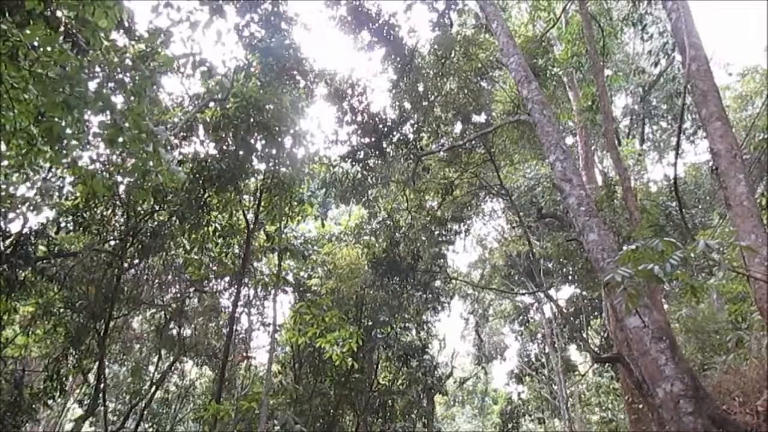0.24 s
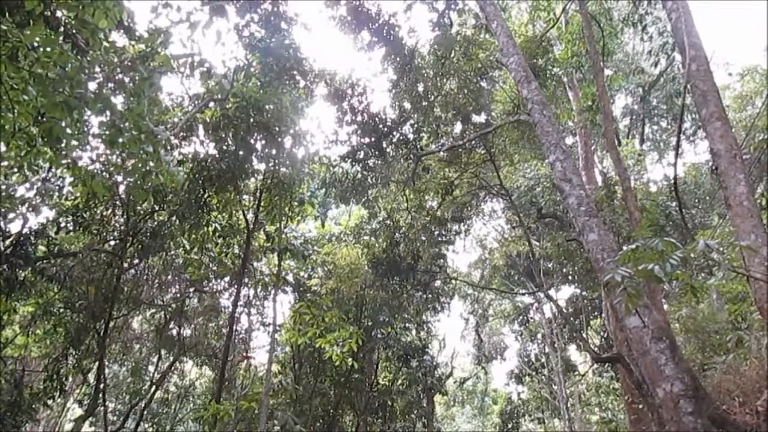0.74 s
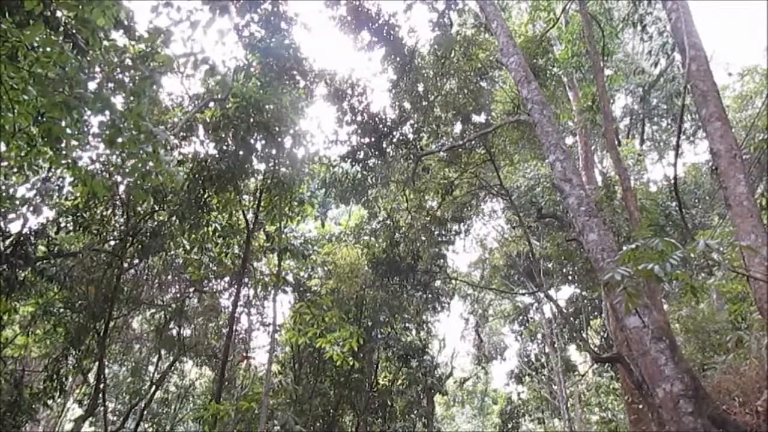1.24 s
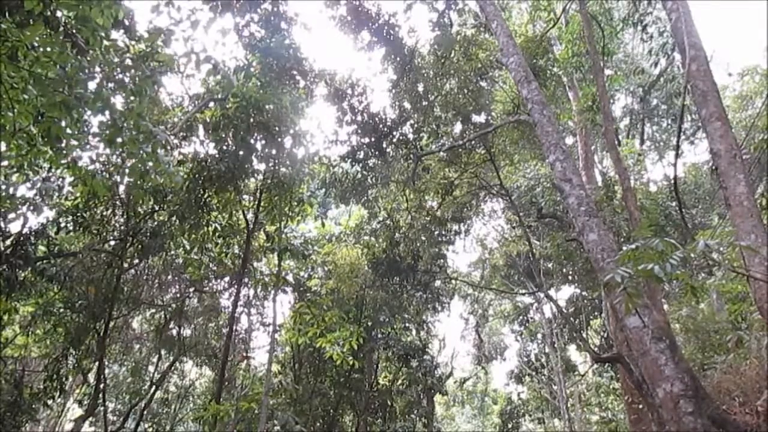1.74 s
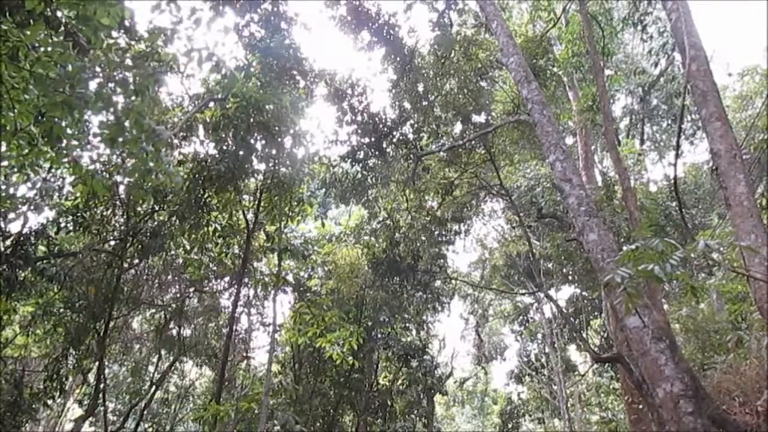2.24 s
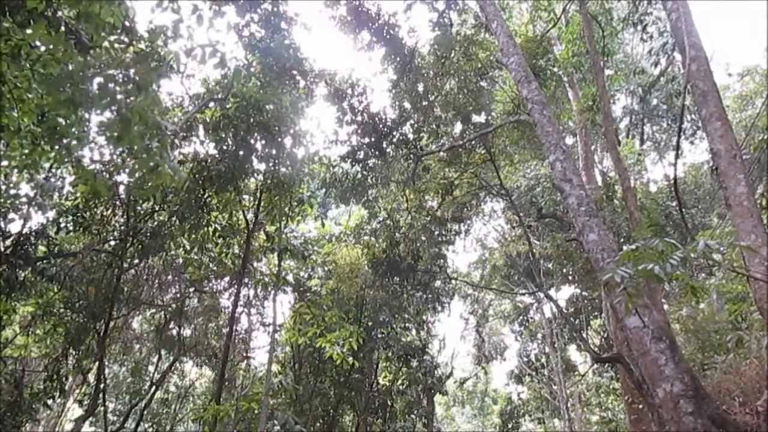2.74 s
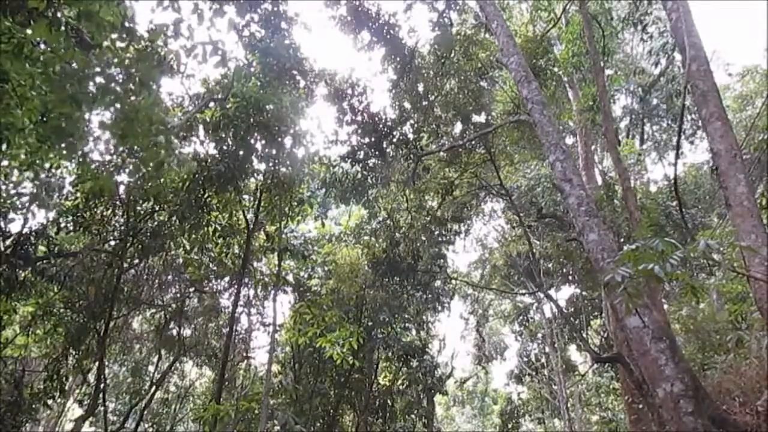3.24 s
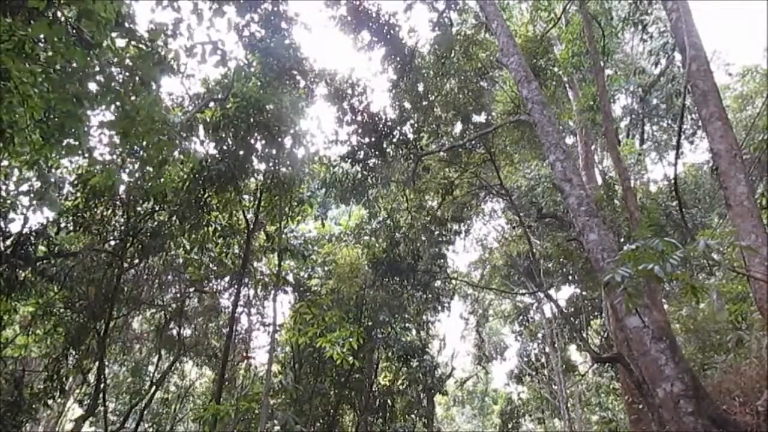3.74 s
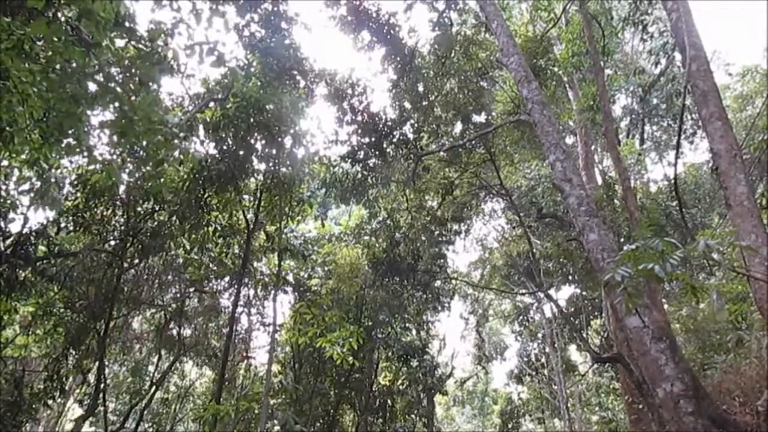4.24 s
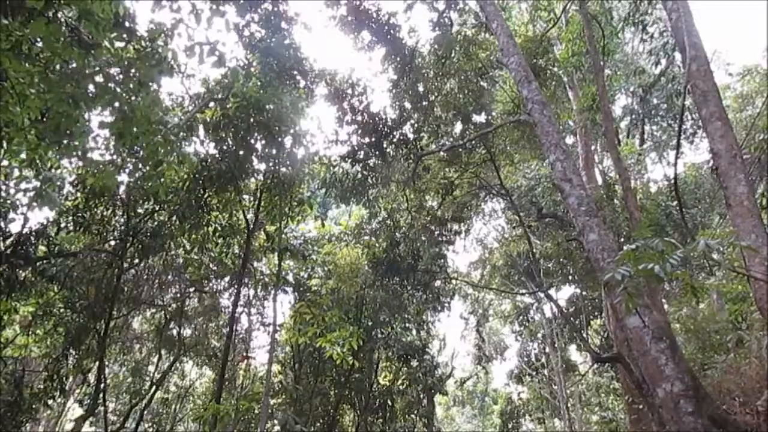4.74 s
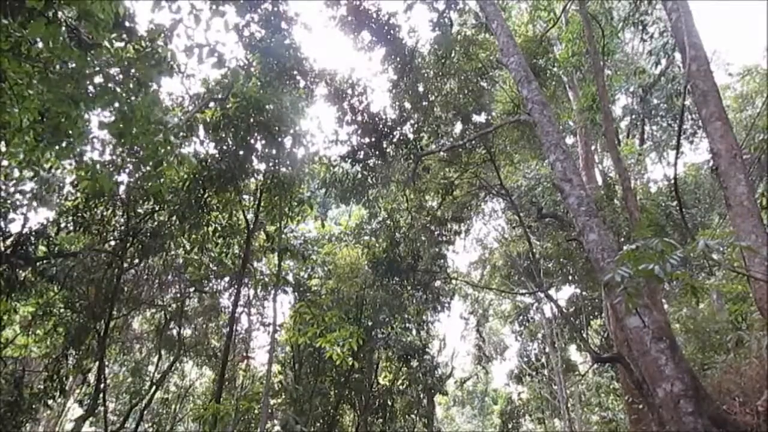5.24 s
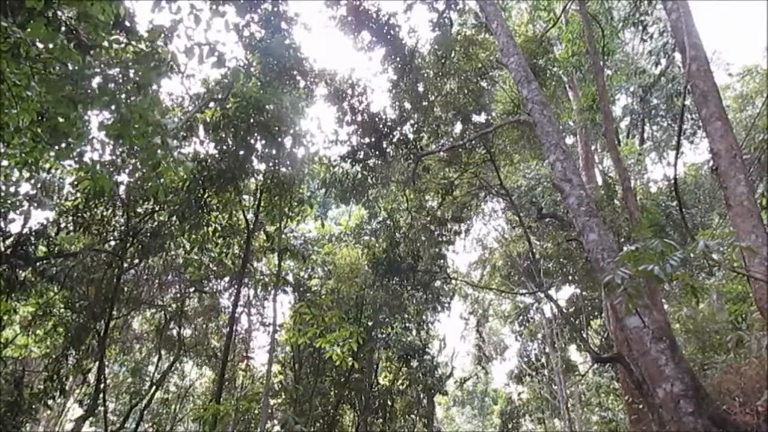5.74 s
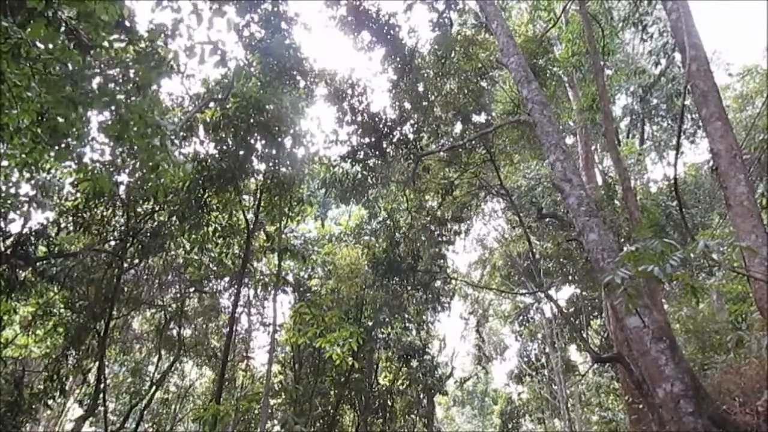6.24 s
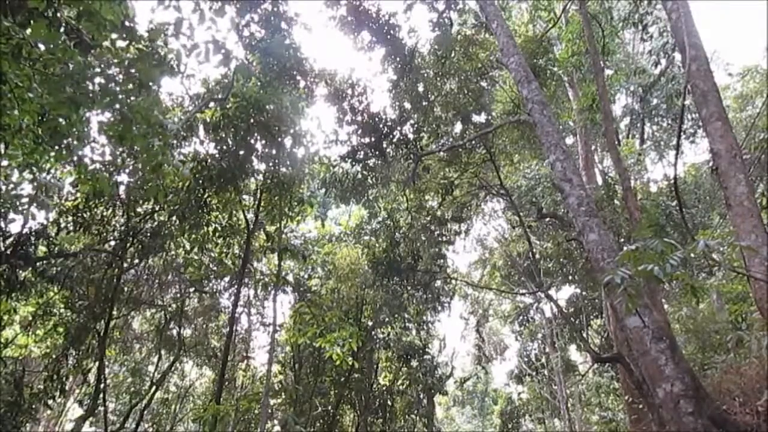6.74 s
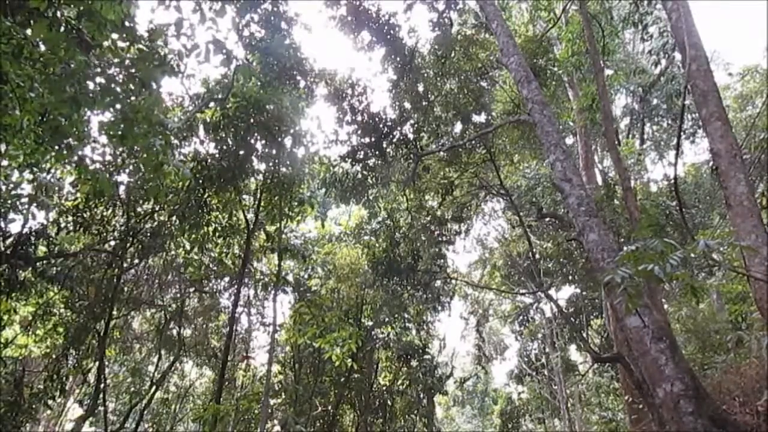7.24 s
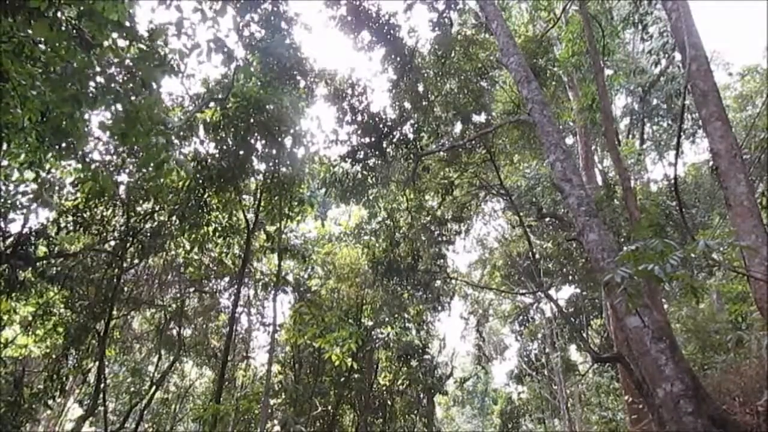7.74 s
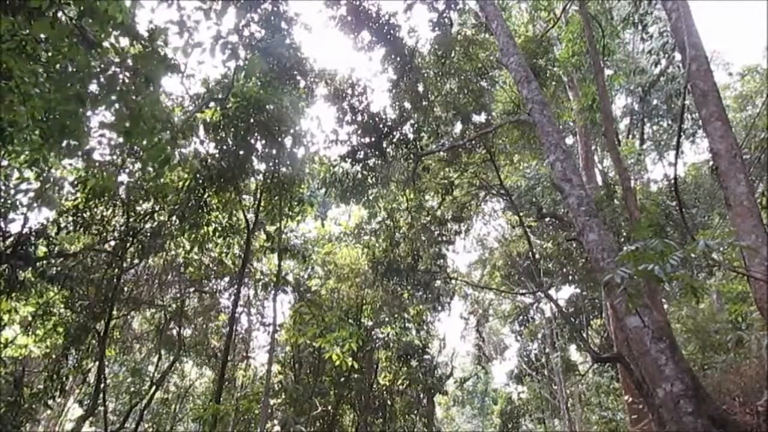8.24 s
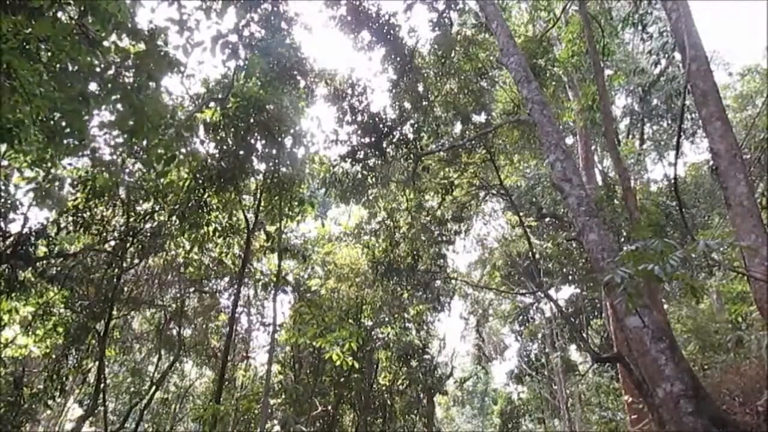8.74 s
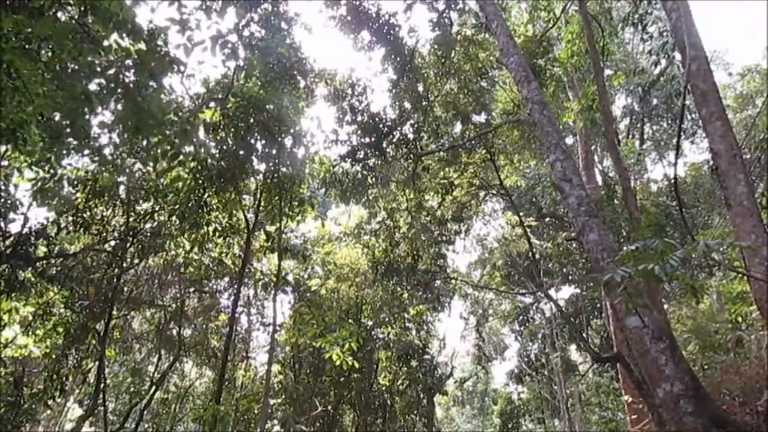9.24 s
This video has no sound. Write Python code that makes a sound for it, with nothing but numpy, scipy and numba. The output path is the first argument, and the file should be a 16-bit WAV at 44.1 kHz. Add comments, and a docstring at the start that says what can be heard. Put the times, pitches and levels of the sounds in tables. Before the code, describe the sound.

A stereo microphone stands in a wood, with soft, low air and leaf hush. Throughout, a dense high insect drone shimmers, while brighter cicada buzzing swells and falls irregularly, strongest in the first three seconds and leaning right. From 0 s two birds on the right repeat quick four-note phrases: a faint lead-in, then three clear, mellow notes around 1 kHz, each gliding downward. The louder bird is slightly lower; each repeats roughly every 0.75 s, so they interleave, with discrete echoes and a brief woodland tail. Softer distant notes appear around 0.5, 1.3 and 1.5 s, then in small clusters from 6.3 s, clearest near 9.1 s. From about 3 to 6 s a harsh, buzzy rasp repeats every 0.4 s, mostly a bright pickup followed by a fuller accent, blurred by the trees. At about 9.4 s comes one small, dry woody knock.

```python
"""Whistling birds in an insect-filled wood

Two forest birds to the right repeat a four-note phrase of short falling whistles, in and out of step:
gliding near-sines with discrete echoes and a diffuse tail. Farther birds are softer in the same scatter.
A harsh rasping caller is a pulse train ringing two resonances; insect choruses are random clicks in
resonant bands. A small woody knock is a sum of dying modes; the hush of air and leaves is shaped noise."""
import sys
import numpy as np
from scipy import signal
from scipy.io import wavfile
from numba import njit

SR = 44100
rng = np.random.default_rng(int(sys.argv[2]) if len(sys.argv) > 2 else 0)


def undo_db(level):
    """Turn decibels back into plain size, where 20 dB means ten times bigger."""
    steps = np.asarray(level, float) / 20
    return 10 ** steps


def digitize_waveform(pressure):
    """Quantize a signal to 16-bit integers and store it at the path in sys.argv[1].

    Rows of a 2-D input are taken as channels; values are limited to [-1, 1].
    """
    field = np.atleast_2d(pressure).T
    bounded = np.clip(field, -1, 1)
    quanta = np.round(bounded * 32767).astype(np.int16)
    wavfile.write(sys.argv[1], SR, quanta)


N = 418068


def rms_one(x):
    """Normalization: scales a signal to unit rms."""
    return x / np.sqrt(np.mean(x ** 2) + 1e-20)


def in_time(rows):
    """Linear interpolation: the columns of a table, read at every sample."""
    times_s, *columns = np.transpose(rows)
    return [np.interp(np.arange(N) / SR, times_s, column) for column in columns]


def at_hz(points, hz):
    """Logarithmic frequency scale: a spectrum interpolated on a log axis."""
    points_hz, values = np.transpose(points)
    return np.interp(np.log(hz), np.log(points_hz), values)


def sides(pan_db):
    """Level-difference stereo: left and right gains for a left-minus-right level."""
    return undo_db(np.array([[.5], [-.5]]) * pan_db)


def add(track, sound, start_s):
    """Superposition: mixes a sound in at a time, trimmed at both ends."""
    at = round(start_s * SR)
    part = sound[max(-at, 0):max(N - at, 0)]
    track[max(at, 0):max(at, 0) + len(part)] += part


def drift(corner_hz):
    """Low-passed random process: slow chance of unit rms, drawn at every 50th sample."""
    r = np.exp(-100 * np.pi * corner_hz / SR)
    draws = rng.standard_normal(N // 50 + 1002)
    slow = signal.lfilter([1], [1, -2 * r, r * r], draws)[1000:]  # the filter has settled by then
    return np.interp(np.arange(N) / 50, np.arange(len(slow)), rms_one(slow))


def swells(top_s, top_db, hold_s, rise_db_per_s, fade_db_per_s, floor_db):
    """Addition of powers: level in dB of sounds that climb, hold and fade, summed over a floor."""
    top_s, top_db, hold_s = [np.reshape(column, (-1, 1)) for column in (top_s, top_db, hold_s)]
    since_s = np.arange(0, N, 100) / SR - top_s if np.ndim(top_s) else 0
    rise_db = rise_db_per_s * since_s
    fade_db = fade_db_per_s * (hold_s - since_s)
    shape_db = np.minimum(0, np.minimum(rise_db, fade_db))
    power = np.sum(undo_db(2 * (top_db + shape_db)), axis=0) + undo_db(2 * floor_db)
    return np.interp(np.arange(N), np.arange(0, N, 100), 10 * np.log10(power))


@njit
def resonate(x, hz, width_hz, sr):
    """Two-pole resonance with a moving centre, applied twice so its skirts are steep."""
    r = np.exp(-np.pi * width_hz / sr)
    for turn in range(2):
        y = np.zeros_like(x)
        for c in range(x.shape[0]):
            for i in range(2, x.shape[1]):
                pull = 2 * r * np.cos(2 * np.pi * hz[i] / sr)
                y[c, i] = (1 - r * r) / 2 * (x[c, i] - x[c, i - 2]) + pull * y[c, i - 1] - r * r * y[c, i - 2]
        x = y
    return x


def wood(x, wet_db, onset_s=0.01):
    """Diffuse reverberation: trunks scatter sound into a dying tail, unrelated on the two sides."""
    t60_s = 0.76
    t = np.arange(SR) / SR
    tail = rng.standard_normal((2, SR)) * undo_db(-60 * t / t60_s) * (1 - np.exp(-t / onset_s))
    tail /= np.sqrt(np.sum(tail ** 2, axis=1, keepdims=True))
    return undo_db(wet_db) * signal.fftconvolve(np.atleast_2d(x), tail, axes=1)[:, :N]


# spectrum of air and leaf noise: (frequency [Hz], relative power density [dB per Hz])
HUSH_SPECTRUM = [(15, -33), (25, 3.5), (101, 4.5), (267, 0.5), (741, -10), (919, -6), (1410, -11.5),
                 (2360, -21), (3170, -13), (4620, -19), (5730, -10.5), (6920, -13), (8580, -13),
                 (9300, -9.5), (15500, -25)]
# left-right correlation of that noise: (frequency [Hz], correlation [-1 to 1])
HUSH_CORRELATION = [(60, -0.43), (200, -0.48), (400, -0.24), (800, 0.26), (2000, 0.03)]


def hush():
    """Band-shaped noise: third octaves stir a little; bass correlates negatively between the channels."""
    treble_sink_db_per_s, treble_from_hz = 0.37, 11000
    out, edges_hz = 0, 20 * 2 ** np.arange(0, 9.8, 1 / 3)
    sink_db = -treble_sink_db_per_s * (np.arange(N) - N / 2) / SR
    white = rng.standard_normal((2, 2, N))  # neighbouring bands take different noise
    stir = [drift(8.6) for k in range(4)]
    for k, (low, high) in enumerate(zip(edges_hz, edges_hz[1:])):
        band = signal.butter(2, [low, high], "band", fs=SR, output="sos")
        mid, side = signal.sosfilt(band, white[k % 2])
        hz = np.sqrt(low * high)
        alike = np.clip(at_hz(HUSH_CORRELATION, hz), -1, 1)
        change_db = 1.27 * stir[k // 2 % 4] if hz < treble_from_hz else sink_db
        gain = undo_db(at_hz(HUSH_SPECTRUM, hz) + change_db)
        out = out + gain * (np.sqrt(1 + alike) * mid + np.sqrt(1 - alike) * side * [[1], [-1]])
    return undo_db(-50) * rms_one(out) * sides(-2.2)


def clicks(per_s, spread_db):
    """Random impulse process: a chorus's tymbal clicks, at chance moments on each side."""
    struck = rng.random((2, N)) < per_s / SR
    return struck * undo_db(rng.normal(0, spread_db, (2, N))) * rng.choice([-1, 1], (2, N))


# levels of the high drone and a lower buzz, before panning: (time [s], drone level [dB], buzz level [dB])
DRONE_LEVELS = [(0.0, -54, -63), (0.4, -54.5, -61.5), (0.63, -50, -55.5), (0.95, -54.5, -58.5),
                (1.5, -54.5, -63), (2.05, -53, -59), (2.8, -54, -64), (3.1, -53, -60.5), (4.1, -54, -59),
                (4.9, -55, -61.5), (5.42, -52.5, -58.5), (5.65, -55, -61.5), (6.4, -54, -64.5),
                (6.75, -52.5, -59.5), (7.05, -56, -66), (8.15, -52.5, -60.5), (8.45, -56, -65),
                (9.48, -53, -62)]
# resonances of the drone: (centre [Hz], pole width [Hz], relative gain [dB])
DRONE_BANDS = [(7710, 1220, -2.5), (8340, 780, 0.5), (9080, 1370, -0.5), (6810, 310, -12),
               (11200, 1200, -15)]


def drone():
    """Merging of dense impulses: far insects' clicks fuse into continuous resonant bands."""
    drone_db, buzz_db = in_time(DRONE_LEVELS)
    train = clicks(15000, 1.5)
    bands = 0
    for k, (hz, width_hz, band_db) in enumerate(DRONE_BANDS):
        band = resonate(train, np.full(N, float(hz)), float(width_hz), SR)
        bands = bands + undo_db(band_db) * (-1) ** k * band  # alternating polarity
    buzz = resonate(train[::-1], np.full(N, 4050.0), 1900.0, SR)  # clicks with sides exchanged
    steady = undo_db(drone_db) * rms_one(bands) * undo_db(0.86 * drift(9.7)) * sides(-3.5)
    return steady + undo_db(buzz_db) * rms_one(buzz) * sides(-4.5)


# swells of the cicadas: (time of reaching full voice [s], upper-band level before panning [dB], hold [s])
CICADA_SWELLS = [(0.0, -55, 0.12), (0.3, -60.5, 0.31), (0.93, -53, 0.16), (1.36, -55, 0.22),
                 (1.7, -65, 0.1), (2.1, -59, 0.05), (2.3, -52, 0.12), (2.85, -57, 0.25), (3.72, -58, 0.2),
                 (3.95, -61, 0.87), (4.05, -58, 0.24), (5.35, -55, 0.1), (5.6, -58, 0.52), (6.8, -61, 0.1),
                 (7.0, -57.5, 0.08), (7.5, -59.5, 0.13), (8.35, -58, 0.11), (9.02, -59, 0.092),
                 (9.42, -63, 0.1)]


def cicadas():
    """Click-driven resonance: the upper band climbs with effort below a sharp top edge, over a lower band."""
    top_s, top_db, hold_s = np.transpose(CICADA_SWELLS)
    upper_db = swells(top_s, top_db, hold_s, rise_db_per_s=51, fade_db_per_s=38, floor_db=-66)
    effort_db = upper_db + 56
    upper_hz = 5895 + 28 * effort_db
    lower_db = -64.5 + 1.33 * effort_db
    edges = signal.butter(6, [4800, 6400], "band", fs=SR, output="sos")
    train = signal.sosfilt(edges, clicks(9000, 2.5))
    upper = undo_db(upper_db) * rms_one(resonate(train, upper_hz, 1460.0, SR))
    lower = undo_db(lower_db) * rms_one(resonate(train[::-1], np.full(N, 5150.0), 1060.0, SR))
    return (upper + lower) * undo_db(0.68 * drift(13)) * sides(-10.0)


def share_right(x, lead_samples=4):
    """Inter-channel coherence: a faint part of the right also sounds on the left, slightly earlier."""
    return np.array([x[0] + undo_db(-22) * np.roll(x[1], -lead_samples), x[1]])


# the rasping caller, a bright pickup and then a full accent, levels of the upper resonance before
# scatter and panning: (accent time [s], accent level [dB], pickup level [dB])
RASP_CALLS = [(2.96, -63, -90), (3.46, -57.5, -59.5), (3.85, -58, -55.5), (4.25, -57, -56),
              (4.65, -58.5, -55.5), (5.04, -59.5, -59), (5.43, -57, -56.5), (5.84, -57.5, -58.5)]


def rasp():
    """Source-filter: uneven pulses ring an upper and, mainly on accents, a lower resonance; the wood blurs."""
    pickup_lead_s, rise_s, hold_s = 0.18, 0.035, 0.024
    accent_lower_db, pickup_lower_db = 1.5, -10  # lower resonance against the upper
    accent_s, accent_db, pickup_db = np.transpose(RASP_CALLS)
    top_s = np.r_[accent_s, accent_s - pickup_lead_s] + rise_s
    rise_db_per_s = 20 / rise_s
    upper_top_db = np.r_[accent_db, pickup_db]
    lower_top_db = np.r_[accent_db + accent_lower_db, pickup_db + pickup_lower_db]
    hold = np.full(len(top_s), hold_s)
    upper_db = swells(top_s, upper_top_db, hold, rise_db_per_s, fade_db_per_s=50, floor_db=-120)
    lower_db = swells(top_s, lower_top_db, hold, rise_db_per_s, fade_db_per_s=70, floor_db=-120)
    pulses_per_s = 144 * (1 + .03 * drift(3) + .018 * drift(40))
    cycles = np.cumsum(pulses_per_s) / SR
    pulses = np.diff(np.floor(cycles), prepend=0) * undo_db(rng.normal(0, 1.0, N))
    source = (pulses + .055 * rng.standard_normal(N))[None]
    upper = undo_db(upper_db) * rms_one(resonate(source, 3160 + 60.0 * drift(5), 570.0, SR))
    lower = undo_db(lower_db) * rms_one(resonate(source, np.full(N, 2520.0), 1070.0, SR))
    call = upper - lower
    return (call * undo_db(-4.5) + wood(call, 1.2, onset_s=0.0022)) * sides(-6.5)


# modes of a small woody knock: (frequency [Hz], relative level [dB], decay time T60 [s])
WOOD_MODES = [(900, 0, 0.051), (1220, -4, 0.03), (1800, -24, .015)]


def knock():
    """Modal decay: one blow on dry wood excites a few modes that die at once."""
    t, out = np.arange(SR // 10) / SR, np.zeros(N)
    blow = 0
    for hz, mode_db, t60_s in WOOD_MODES:
        blow = blow + undo_db(-44 + mode_db - 60 * t / t60_s) * np.sin(2 * np.pi * hz * t)
    add(out, blow, 9.373)
    return out * sides(-8.0)


def whistle(length_ms, db, pitches_hz, rise_ms=3.0, lean=.17):
    """Frequency modulation: a near sine glides through four pitches, snaps on, swells, then tapers."""
    ms = np.arange(round(length_ms * SR / 1000)) * 1000 / SR
    u = ms / length_ms
    glide_hz = np.polyval(np.polyfit(np.linspace(0, 1, 4), pitches_hz, 3), u)
    phase = 2 * np.pi * np.cumsum(glide_hz) / SR
    octave = undo_db(-26) * (1 - u) * np.sin(2 * phase)
    onset = 1 - np.exp(-(ms / rise_ms) ** 2)
    swell = np.sin(np.pi * (lean + (1 - lean) * u)) ** 1.1
    return undo_db(db) * onset * swell * (np.sin(phase) + octave)


# single notes of distant birds, before scatter and panning:
# (time [s], level [dB], middle pitch [Hz], left minus right [dB])
DISTANT_NOTES = [(0.509, -55.5, 970, -12), (1.278, -53.5, 937, -9), (1.507, -47.5, 1036, -11),
                 (6.306, -50, 944, -11), (6.389, -52, 977, -5), (7.038, -55, 950, -16),
                 (7.099, -57, 940, -6), (7.171, -57, 885, -8), (7.236, -53.5, 978, -7.5),
                 (7.848, -56.5, 1045, -12.0), (7.927, -55.5, 920, -12), (7.999, -57, 966, -2),
                 (8.07, -55, 980, -10), (8.751, -53.5, 922, -2), (8.82, -58, 967, -12),
                 (8.896, -53, 1010, -7), (9.088, -44.5, 1110, -10), (9.168, -47, 1094, -7),
                 (9.236, -49, 950, -12), (9.269, -50.5, 1044, -5)]


def far_birds():
    """Low direct-to-reverberant ratio: short falling notes, half lost in the scatter of the wood."""
    out = np.zeros((2, N))
    for note_s, db, hz, pan_db in DISTANT_NOTES:
        note = whistle(27, db, hz * np.array([1.09, 1.04, .97, .91]), rise_ms=5.0)
        for side, gain in zip(out, sides(pan_db)[:, 0]):
            add(side, gain * note, note_s - .006)
    return out + wood(out, -1.0)


def tick(db):
    """Transient excitation: the throat pops open, a few quick cycles above the note."""
    t = np.arange(-250, 250) / SR
    return undo_db(db) * np.exp(-(t / .0018) ** 2) * np.sin(2 * np.pi * 1730 * t)


# phrases of each bird: (time [s], time from first to third loud note [s], relative level [dB])
HIGH_PHRASES = [(0.5611, 0.1281, -1.0), (1.3166, 0.1296, -0.9), (2.092, 0.13, 0.0), (2.848, 0.1289, -0.8),
                (3.6049, 0.129, 1.0), (4.3593, 0.1302, 0.0), (5.1497, 0.1307, 0.0), (5.953, 0.131, -0.4),
                (6.7229, 0.131, 2.0), (7.5114, 0.131, 1.1), (8.2614, 0.129, -0.5), (8.9823, 0.1309, 0.0)]
LOW_PHRASES = [(-0.017, 0.1256, 0), (0.7756, 0.1271, 0.8), (1.5466, 0.1262, 0.3), (2.282, 0.125, 0.0),
               (3.0271, 0.1242, -1.4), (3.8343, 0.1273, -2.1), (4.5771, 0.1259, -0.9),
               (5.3099, 0.1252, -0.2), (6.0449, 0.1248, 0.0), (6.7899, 0.1274, -2.3),
               (7.5884, 0.1278, -0.9)]
# notes of a phrase, soft lead-in first, pitches evenly through the note; chance varies levels and pitch:
# (delay [ms], length [ms], level [dB], opening pop level [dB], pitch 1 [Hz], 2 [Hz], 3 [Hz], 4 [Hz])
HIGH_PHRASE_NOTES = [(0, 32, -51, -80, 920, 910, 900, 885), (0.5, 35, -35.5, -57, 1290, 1340, 1150, 850),
                     (0, 29, -38.5, -63, 1185, 1105, 970, 845), (0, 31, -37.5, -61, 1205, 1090, 990, 875)]
LOW_PHRASE_NOTES = [(0, 40, -50, -80, 855, 830, 790, 730), (0.5, 35, -29.5, -47, 1205, 1238, 1055, 800),
                    (1, 29, -33.5, -56, 1115, 1015, 915, 810), (0.5, 32, -30, -55, 1100, 1045, 922, 815)]
# early reflections from ground and trunks: (delay [ms], left gain [dB], right gain [dB])
HIGH_REFLECTIONS = [(5.03, -10, -16), (11.19, -4, -9.5), (26.15, -24, -22), (39.7, -15, -27.5),
                    (73, -20, -43)]
LOW_REFLECTIONS = [(3.92, -14.5, -37), (13.79, -13, -16.5), (26.93, -13.5, -19), (37.7, -17, -16.5),
                   (70, -20, -25.5)]


def bird(phrases, notes, lead_s, echoes, pan_db, wet_db, left_lag):
    """Interaural time and level difference: varied whistles reach the left left_lag samples late, softer."""
    voice = np.zeros(N)
    for phrase_s, third_s, phrase_db in phrases:
        places_s = [-lead_s, 0, 0.503 * third_s, third_s]
        for place_s, (late_ms, length_ms, note_db, pop_db, *pitches_hz) in zip(places_s, notes):
            detune, force_db, pop_change_db = rng.normal(0, [.004, .7, 2])
            onset_s = phrase_s + place_s + late_ms / 1000
            note = whistle(length_ms, note_db + phrase_db + force_db, np.multiply(pitches_hz, 1 + detune))
            add(voice, note, onset_s)
            add(voice, tick(phrase_db + pop_db + pop_change_db), onset_s - .008)
    direct = np.array([np.roll(voice, left_lag) * undo_db(pan_db), voice])
    out = direct.copy()
    for delay_ms, left_db, right_db in echoes:
        lag = round(delay_ms * SR / 1000)
        out[:, lag:] += direct[:, :-lag] * undo_db(np.array([[left_db], [right_db]]))
    return out + wood(voice, wet_db) * sides(-10.5)


def scene():
    """Linear superposition: everything in the wood, summed."""
    insects = share_right(cicadas() + drone())
    high = bird(HIGH_PHRASES, HIGH_PHRASE_NOTES, 0.1236, HIGH_REFLECTIONS,
                pan_db=-15.0, wet_db=-11.5, left_lag=3)
    low = bird(LOW_PHRASES, LOW_PHRASE_NOTES, 0.12, LOW_REFLECTIONS,
               pan_db=-12.0, wet_db=-15.5, left_lag=1)
    return hush() + insects + rasp() + knock() + far_birds() + high + low


def band_limit(x):
    """A steep low-pass at the top of the band."""
    return signal.sosfilt(signal.butter(12, 15765, fs=SR, output="sos"), x)


def record(dry):
    """Band rejection: a notch takes a narrow slit out of the treble of the finished mix."""
    b, a = signal.iirnotch(7875, 60, fs=SR)  # centre in Hz, quality factor
    mix = signal.lfilter(b, a, dry)
    return band_limit(mix)


dry = scene()
out = record(dry)
digitize_waveform(out)
```